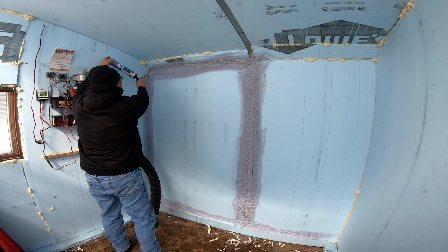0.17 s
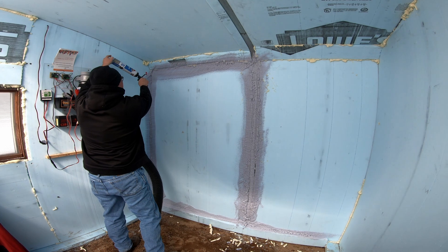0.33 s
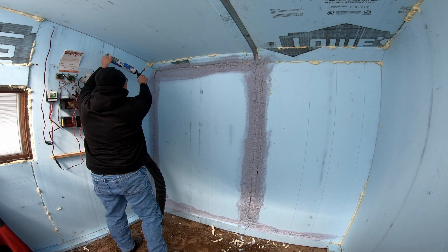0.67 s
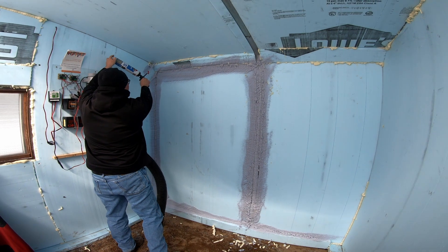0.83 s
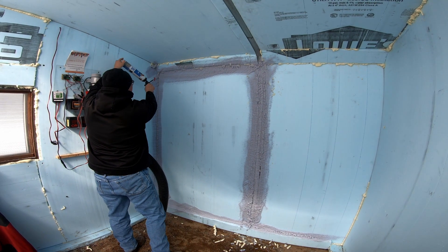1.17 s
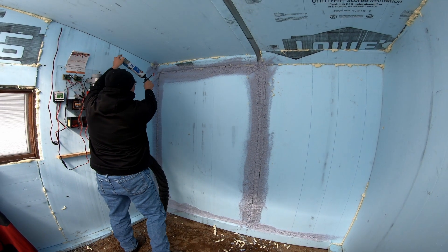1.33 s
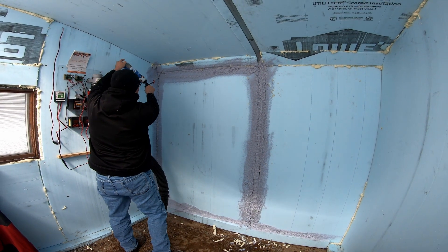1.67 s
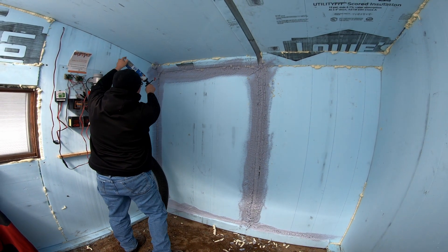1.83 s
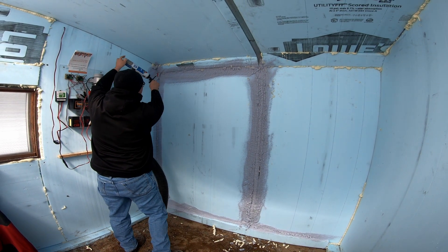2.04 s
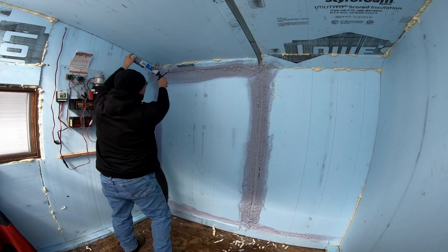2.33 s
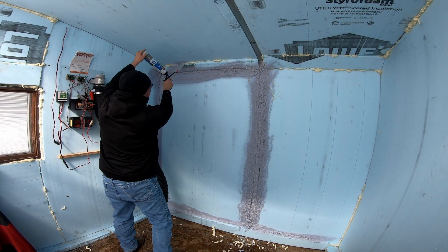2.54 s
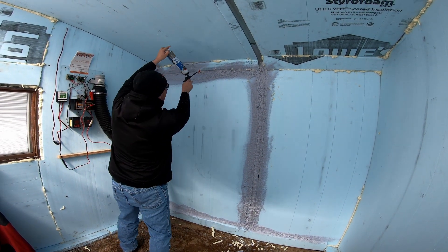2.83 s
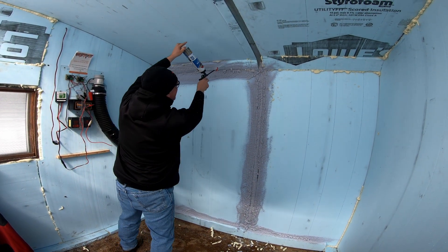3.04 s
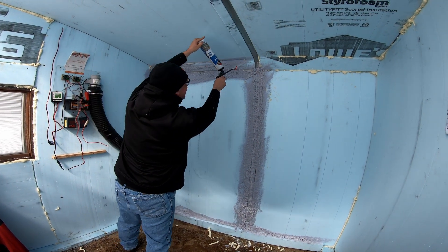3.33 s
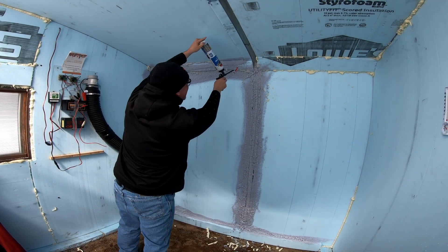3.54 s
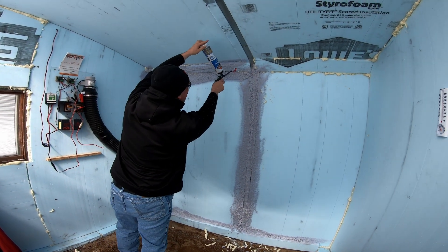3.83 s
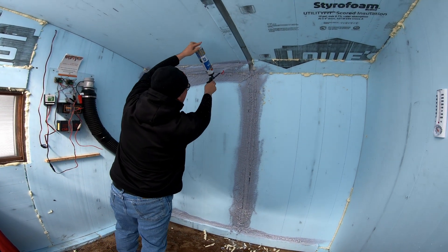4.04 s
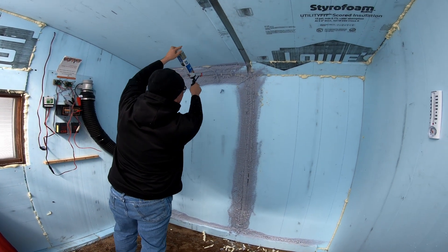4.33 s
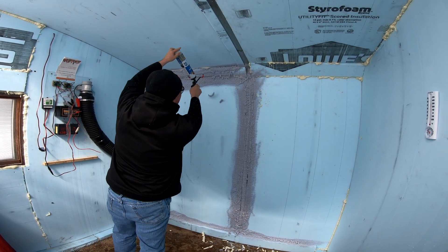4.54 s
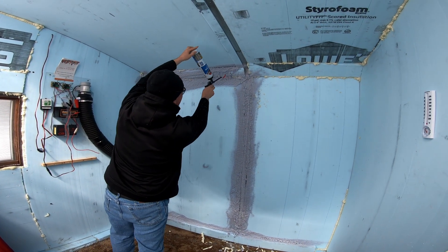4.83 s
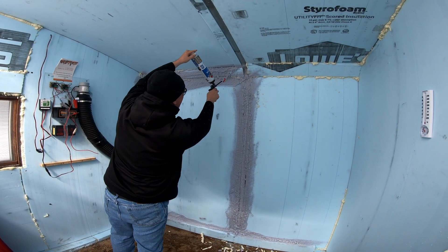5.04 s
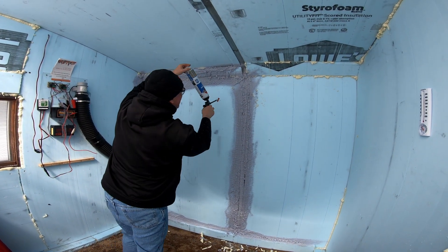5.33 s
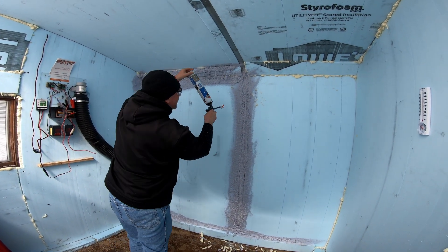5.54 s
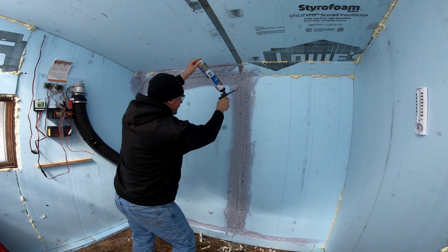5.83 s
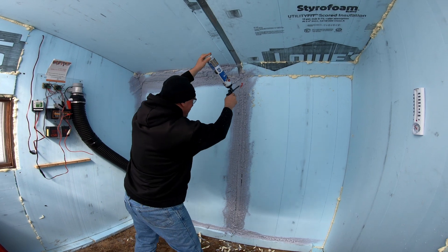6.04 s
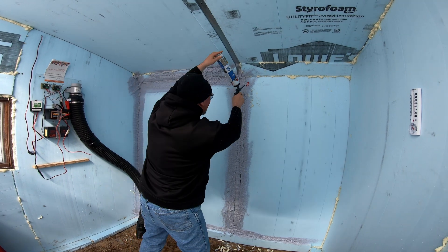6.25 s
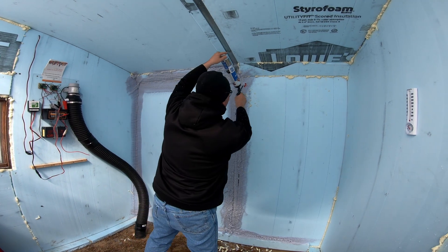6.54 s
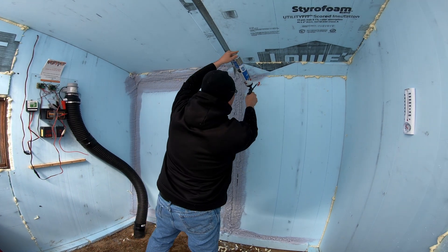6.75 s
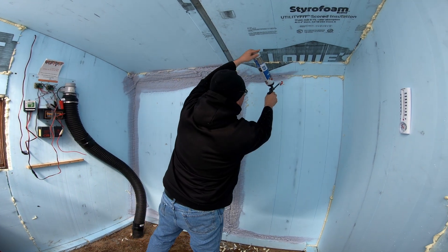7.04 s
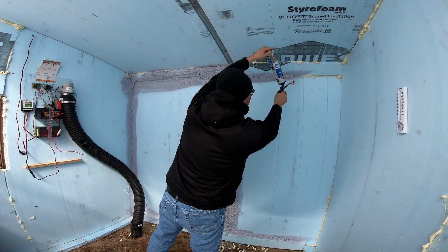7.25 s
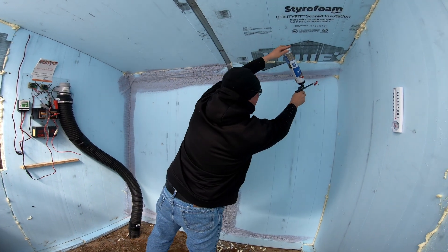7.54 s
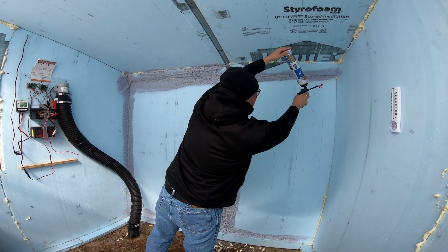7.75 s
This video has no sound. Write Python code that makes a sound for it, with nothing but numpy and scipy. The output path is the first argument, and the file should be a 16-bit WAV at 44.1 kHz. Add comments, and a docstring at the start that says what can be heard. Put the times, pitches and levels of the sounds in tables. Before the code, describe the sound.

A foam gun hisses loudly in a small shed: two quick squirts, a longer spray, then two shorter bursts, each with a low rush underneath and a sudden stop. Boots thud and scuff softly on the wooden floor with a little jacket rustle, then one last long spray follows. The sound is fairly close, with a short room echo and a faint hum.

```python
"""Spraying foam in a small shed

A foam gun moves along the seam of wall and ceiling in a shed lined with foam board. Each trigger pull
frees a turbulent jet: its hiss interferes with echoes from the corner, and its large eddies drive the
shed's low standing waves. Soles and a jacket rub, boots set the floorboards ringing, a faint hum stays."""
import sys
import numpy as np
from scipy import signal
from scipy.fft import rfft, irfft, next_fast_len
from scipy.io import wavfile
from scipy.ndimage import uniform_filter1d, map_coordinates

SR = 44100
rng = np.random.default_rng(int(sys.argv[2]) if len(sys.argv) > 2 else 0)


def master(y):
    """Save y as 16-bit WAV."""
    cut = np.clip(np.atleast_2d(y).T, -1, 1)
    pcm = np.round(cut * 32767)  # scale
    wavfile.write(sys.argv[1], SR, pcm.astype(np.int16))


N = 347949

# trigger pulls: valve cracks t/s, rise while opening/dB, opening time/s, hesitation exponent,
# release t/s, hiss level/dB, roar level/dB, rumble level/dB, hiss tilt/(dB per octave)
TRIGGER_PULLS = [(-.3, 15, .06, 1, 0.017, -25, -43, -52.5, 0),
                 (.768, 17, 0.066, 0.92, 1.019, -22, -38.5, -43.5, 1.5),
                 (1.472, 19, 0.047, 0.58, 1.669, -22.5, -41, -49, 1),
                 (2.32, 16.5, 0.16, 0.98, 3.46, -22.5, -38, -49.5, 1),
                 (3.895, 16, 0.056, 1.2, 4.3914, -23, -39, -51, .5),
                 (4.643, 19.5, 0.05, .8, 4.874, -22, -38.5, -53, 0),
                 (6.532, 10.5, 0.096, 2.5, 7.743, -21.5, -38, -41, 0.48)]
# the gun's travel: t/s, place along the wall/m, near echo delay/ms, its strength (0-1),
# far echo delay/ms, its strength (0-1)
GUN_PATH = [(0, .1, .26, .2, 2.2, .1), (.78, 0, .39, 0.2, 2.5, 0.3), (1.1, 0, .4, 0.2, 2.7, .4),
            (1.48, 0, .48, 0.2, 1.4, 0.3), (1.75, 0, .2, .25, 1.4, .2), (2.33, .3, .15, .1, 2.7, 0),
            (3.5, .6, .52, .1, 1.3, .15), (3.9, 0.85, .54, 0, 1.5, .05), (4.47, 0.62, .47, .15, 0.76, .05),
            (4.65, 0.56, .65, 0, 1.7, .1), (4.96, .8, 0.62, 0.1, 1.4, 0), (6.559, 1.1, 1.1, 0, 1.9, 0.1),
            (7.1, 1.4, .75, .3, 1.5, .15), (7.351, 1.55, .54, 0.4, 0.7, .2), (7.62, 1.7, .33, 0.2, 1, 0.1),
            (7.851, 1.8, 0.23, 0.3, 1.15, 0.1)]
# jet noise, from small eddies to large: f/Hz, spectral level/dB
HISS_SPECTRUM = [(260, -36.5), (450, -13.5), (580, -11.5), (758, -5), (906, -6.5), (1180, -4), (1480, -5),
                 (2770, 0.5), (4520, -3), (7280, -0.5), (10400, -5.5), (11400, -13), (13800, -18),
                 (15800, -27)]
ROAR_SPECTRUM = [(65, -33), (110, -5), (221, 4.5), (371, -5.5), (407, -2), (581, -8.5), (700, -11.5),
                 (910, -37), (1540, -120)]
RUMBLE_SPECTRUM = [(13, -57), (22, -30), (48, -16.5), (67, -8.5), (81, 4.5), (125, 4), (160, -34.5),
                   (280, -120)]
# left-right likeness of the hiss, whose treble the worker's body scatters: f/Hz, coherence
JET_COHERENCE = [(500, 1), (1400, 0.48), (3100, 0.9), (7000, 0.18), (14000, 0.092)]
# the shed's lowest standing waves: f/Hz, bandwidth/Hz, level/dB
STANDING_WAVES = [(84, 10, -9.5), (167, 29, 2), (225.5, 13, -4), (265.5, 16, 0), (407.6, 11, -10.5)]
# bands that stand out at one stretch of wall: f/Hz, width/Hz, lift/dB, place/m, reach/m
WALL_BANDS = [(289, 53, 9.5, 0.11, 0.14), (995, 60, 12, 0, 0.089), (1376, 65, 7.5, 0, .08),
              (410, 40, 10, .6, 0.26), (3570, 400, 5.5, .69, 0.024), (2950, 190, 5.5, .78, 0.046),
              (2840, 310, 4, 1.25, 0.13), (7320, 400, 3.5, 1.45, 0.41), (2800, 230, 5, 1.73, 0.065)]
# the shed's reverberation time: f/Hz, t60/s
REVERB_TIMES = [(100, 0.48), (260, .36), (700, 0.27), (1840, 0.23), (4850, 0.22), (12800, .17)]
# reverberation against direct sound: f/Hz, level/dB
REVERB_LEVELS = [(100, -5.5), (600, 2.5), (3000, -3), (8000, -2), (14000, 0.5)]
# left-right likeness of the reverberation: f/Hz, coherence
REVERB_COHERENCE = [(60, 0.85), (330, 0.93), (640, 0.16), (3000, 0.11), (7000, 0.01)]
# background hum: f/Hz, spectral level/dB
HUM_SPECTRUM = [(13, -38), (22, -19.5), (42, -12.5), (60, -24.5), (103, -25), (134, -11), (160, -3.5),
                (202, -9.5), (487, -17.5), (526, -24), (736, -13.5), (1000, -22.5), (1960, -29.5),
                (2180, -30), (10500, -43), (13600, -78), (22000, -120)]
# left-right likeness of the hum: f/Hz, coherence
HUM_COHERENCE = [(60, 0.25), (300, 0.3), (700, 0.01), (3000, 0.16)]
# soles and jacket rubbing: t/s, swell time/s, t60/s, sole level/dB, cloth level/dB
RUBS = [(.2, .12, 3, -79.5, -90), (.54, .025, .2, -71, -76), (1.2, .1, 3, -79.5, -88),
        (2.05, .12, 3, -78, -90), (3.71, .012, .2, -52.5, -64), (3.78, .05, 3, -76, -82),
        (5.25, 0.036, 2, -74.5, -74), (5.545, .015, .8, -55, -62), (5.67, 0.064, 0.27, -56.5, -68),
        (5.8, .06, 4.5, -77, -81), (6.059, 0.039, 0.38, -55.5, -59.5), (6.19, 0.035, 0.63, -66.5, -68),
        (6.37, 0.053, 3, -70, -66.5)]
# friction noise of sole and jacket: f/Hz, spectral level/dB
SOLE_SPECTRUM = [(290, -26), (500, -4.5), (2070, 0), (2230, -3.5), (2500, -2.5), (4330, -5.5), (4800, -13),
                 (6240, -43.5), (10600, -120)]
CLOTH_SPECTRUM = [(2500, -29), (4500, -2.5), (7500, 0.5), (10500, -8.5), (14000, -26)]
# boots on boards: t/s, relative thud level/dB, bass tilt/(dB per octave), damping factor,
# slap level/dB, slap t60/s, click level/dB
FOOTFALLS = [(3.708, -43, 8.5, 0.93, -46, 0.081, -55), (5.512, -70, 2, 1.1, -76, 0.088, -55),
             (5.55, -46.5, 7, 1.1, -53, 0.15, -52), (5.621, -45, 14, 1.1, -66, 0.2, -57),
             (5.727, -32.5, 2.5, 1.1, -34, 0.084, -41.5), (5.821, -45, -8, 1.7, -46, 0.062, -63),
             (6.061, -37.5, 4, 0.86, -58, 0.155, -57), (6.212, -30.5, 1, 1.42, -71.5, .14, -73),
             (6.304, -58, -2, 1, -75, .1, -58)]
# the floor's normal modes: f/Hz, level/dB, t60/s at damping factor 1
FLOOR_RESONANCES = [(55, -22.5, 0.17), (81, -14.5, .27), (152.6, -3.5, 0.38), (201, 5, 0.19),
                    (224.3, -0.5, 0.28), (257, -11, 0.35), (311, -9.5, 0.25), (370, -11.5, 0.15)]
# a sole's slap: f/Hz, spectral level/dB
SLAP_SPECTRUM = [(240, -43.5), (400, -11.5), (781, -6.5), (1620, -5.5), (1800, -31), (2890, -25),
                 (6460, -40), (7380, -29.5), (14000, -58.5)]
# ring of a slapped board: f/Hz, bandwidth/Hz, level/dB
BOARD_RESONANCES = [(520, 90, -5.5), (734, 150, 4), (974, 150, -4.5), (1360, 95, 4), (1620, 120, -13)]
# stereo balance: f/Hz, left minus right level/dB
STEREO_BALANCE = [(60, -1), (150, -1.0), (380, -0.5), (950, -1.5), (2380, -1), (5980, -2.0), (15000, 2.5)]


def amp(db):
    return 10 ** (np.asarray(db) / 20)


def unit_rms(x):
    return x / np.sqrt(np.mean(x ** 2) + 1e-20)


def along(points, hz):
    """Interpolation of (f/Hz, value) points on a logarithmic frequency axis."""
    f, value = np.transpose(points)
    return np.interp(np.log(hz + 1), np.log(f + 1), value)


def filtered(x, response):
    """Linear filtering: the spectrum is multiplied by a complex frequency response."""
    n = x.shape[-1]
    padded = next_fast_len(n + 8192)
    return irfft(rfft(x, padded) * response(np.fft.rfftfreq(padded, 1 / SR)), padded)[..., :n]


def coloured(spectrum):
    """Spectral shaping of white noise, scaled to unit rms."""
    return unit_rms(filtered(rng.standard_normal(N), lambda hz: amp(along(spectrum, hz))))


def flutter(corner_hz):
    """Random modulation: low-passed noise of unit rms."""
    return unit_rms(filtered(rng.standard_normal(N), lambda hz: 1 / (1 + (hz / corner_hz) ** 2)))


def wobble(knots_per_s):
    """Slow modulation: a spline through random knots."""
    knots = rng.standard_normal(int(N * knots_per_s / SR) + 4)
    return map_coordinates(knots, [np.arange(N) * knots_per_s / SR])


def paired(a, b, coherence):
    """Partial coherence: two independent signals mix as mid and side into left and right."""
    angle = lambda hz: np.arccos(np.clip(along(coherence, hz), -1, 1)) / 2
    mid, side = filtered(np.array([a, b]), lambda hz: np.array([np.cos(angle(hz)), np.sin(angle(hz))]))
    return np.array([mid + side, mid - side])


def resonant_noise(spectrum, modes):
    """Forced resonance: noise drives modes of alternating sign, added to a flat direct path."""
    def response(hz):
        return .35 + sum((-1) ** k * amp(db) * 1j * hz * width / (f * f - hz * hz + 1j * hz * width)
                         for k, (f, width, db) in enumerate(modes))
    return unit_rms(filtered(coloured(spectrum), response))


def valve_flow(t, crack_s=.023, settle_s=.081, ease_s=.055, seal_s=.028, sag_db_per_s=1.36):
    """Throttling by a valve as pressure sags: gives dB re full flow, and the pull's row at each time."""
    rows = np.array(TRIGGER_PULLS)
    pull = rows[np.clip(np.searchsorted(rows[:, 0], t) - 1, 0, None)].T
    start, rise_db, opening_s, hesitation, release = pull[:5]
    ramp = lambda since, length: np.clip((t - since) / length, 0, 1)
    cracked = start + crack_s
    crack_db = 31 * (1 - ramp(start, crack_s))
    opening_db = rise_db * (1 - ramp(cracked, opening_s) ** hesitation)
    settle_db = 2 * (1 - ramp(cracked + opening_s, settle_s))
    closing_db = 11.5 * ramp(release, ease_s) + 75 * ramp(release + ease_s, seal_s)
    return -(crack_db + opening_db + settle_db + sag_db_per_s * (t - start) + closing_db), pull


def gun_geometry(t):
    """A moving source: its place, and the delay and strength of its two echoes, at times t."""
    times, *columns = np.transpose(GUN_PATH)
    return [np.interp(t, times, column) for column in columns]


def hiss(patchy_db=1.7, echo_top_hz=5000, dulling_db_per_octave_s=.27):
    """Interference: jet noise and its close echoes form a comb filter that slides as the gun moves."""
    noise = paired(coloured(HISS_SPECTRUM), coloured(HISS_SPECTRUM), JET_COHERENCE)
    hz, t, bands = signal.stft(noise, SR, nperseg=512)
    hz = hz[:, None]
    _, near_ms, near_strength, far_ms, far_strength = gun_geometry(t)
    reflected = 1 / (1 + (hz / echo_top_hz) ** 2)  # foam board absorbs treble
    comb = np.prod([1 + strength * reflected * np.exp(-2j * np.pi * hz * ms / 1000)
                    for ms, strength in ((near_ms, near_strength), (far_ms, far_strength))], axis=0)
    flow_db, (start, _, _, _, release, *_, tilt) = valve_flow(t)
    octaves = np.clip(np.log2((hz + 1) / 3000), -2, 2)
    tilt_db = (tilt - dulling_db_per_octave_s * np.clip(t - start, 0, 2)) * octaves  # pressure drops
    # an opening valve makes only small eddies
    thin_db = .65 * np.clip(flow_db + 6.5, -25, 0) * (t < release) / (1 + (hz / 1500) ** 4)
    # many smaller reflections come and go as patches of gain
    patches = uniform_filter1d(rng.standard_normal(comb.shape), size=4, axis=0)
    patches = unit_rms(uniform_filter1d(patches, size=16, axis=1))
    bands = bands * comb * amp(tilt_db + thin_db + patchy_db * patches)
    power = uniform_filter1d(np.mean(np.abs(bands) ** 2, axis=(0, 1)), size=20)
    return unit_rms(signal.istft(bands / np.sqrt(power), SR, nperseg=512)[1][:, :N])


def corner_colour(jet, gap_lift_db=9, gap_relative_width=.25, fade_range_db=25):
    """Reinforcement: bands rise at certain stretches of wall, and one follows 1 / near echo delay."""
    hz, t, bands = signal.stft(jet, SR, nperseg=1024)
    hz = hz[:, None]
    place, near_ms, near_strength, *_ = gun_geometry(t)
    gap_db = gap_lift_db * near_strength * np.exp(-((hz * near_ms / 1000 - 1) / gap_relative_width) ** 2)
    wall_db = sum(db * np.exp(-((place - at) / reach) ** 2) * np.exp(-((hz - centre) / width) ** 2)
                  for centre, width, db, at, reach in WALL_BANDS)
    flowing = np.clip(1 + valve_flow(t)[0] / fade_range_db, 0, 1)
    return signal.istft(bands * amp((wall_db + gap_db) * flowing), SR, nperseg=1024)[1][:, :N]


def spray(sputter_db=.99, roar_exponent=1.7, rumble_exponent=2.1, rumble_lag_s=.038):
    """Turbulent jet noise: large eddies need more flow than the hiss, and the largest build later."""
    sputter = amp(sputter_db * flutter(90) - .5)  # foam tears unevenly, so the whole jet flutters
    roar = resonant_noise(ROAR_SPECTRUM, STANDING_WAVES)
    rumble = resonant_noise(RUMBLE_SPECTRUM, STANDING_WAVES)
    t = np.arange(N) / SR
    flow_db, (*_, hiss_db, roar_db, rumble_db, _) = valve_flow(t)
    late_flow_db = np.minimum(flow_db, valve_flow(t - rumble_lag_s)[0])
    jet = (amp(hiss_db + flow_db + .4 * wobble(8)) * hiss()  # each layer surges at random
           + amp(roar_db + roar_exponent * flow_db + wobble(12)) * roar
           + amp(rumble_db + rumble_exponent * late_flow_db + 4.5 * wobble(10)) * rumble)
    return corner_colour(jet * sputter)


def reverberation(source, hop=4096, delay_samples=130):
    """Diffuse reflection: convolution with decaying noise, drawn afresh each hop as the source moves."""
    room = np.zeros((2, N + 4 * hop + SR))
    window = np.hanning(2 * hop + 1)[:-1]
    source = np.pad(filtered(source, lambda hz: amp(along(REVERB_LEVELS, hz))), (hop, 2 * hop))
    for start in range(0, N + hop, hop):
        hz, t, bands = signal.stft(rng.standard_normal((2, SR // 2)), SR, nperseg=256)
        decay = amp(-60 * t / along(REVERB_TIMES, hz)[:, None])
        decay /= np.linalg.norm(decay, axis=1)[:, None]  # equal energy in every band
        a, b = signal.istft(bands * decay, SR, nperseg=256)[1]
        tail = paired(a, b, REVERB_COHERENCE) / np.linalg.norm(a)
        echoes = signal.fftconvolve((source[start:start + 2 * hop] * window)[None], tail, axes=1)
        room[:, start + delay_samples:][:, :echoes.shape[1]] += echoes
    return room[:, hop:hop + N]


def hum(level_db=-66):
    """Stationary noise: a faint low hum with a little air above it."""
    return amp(level_db) * paired(coloured(HUM_SPECTRUM), coloured(HUM_SPECTRUM), HUM_COHERENCE)


def scuffs(grain_db=2, longest_s=.36):
    """Sliding friction: grainy noise swells and fades, dull from the soles, bright from the jacket."""
    grains = amp(grain_db * flutter(150))
    gains = np.zeros((2, N))
    t = np.arange(round(longest_s * SR)) / SR
    ending = np.clip((longest_s - t) / .03, 0, 1)
    for start, swell_s, t60, *levels_db in RUBS:
        swell = np.clip(t / swell_s, 0, 1) ** 2
        fade = amp(-60 * np.maximum(t - swell_s, 0) / t60)
        gains[:, round(start * SR):][:, :len(t)] += amp(levels_db)[:, None] * swell * fade * ending
    return sum(gain * unit_rms(coloured(spectrum) * grains)
               for gain, spectrum in zip(gains, [SOLE_SPECTRUM, CLOTH_SPECTRUM]))


def footsteps(rise_s=.0037, click_t60=.045):
    """Impact excitation: a heel rings the floor's damped modes; the sole slaps and its edge clicks."""
    thuds, slap_gain, click_gain = np.zeros((3, N + SR))
    t = np.arange(SR // 2) / SR
    rise = 1 - np.exp(-t / rise_s)
    for start, thud_db, bass_tilt, damping, slap_db, slap_t60, click_db in FOOTFALLS:
        ring = np.zeros(len(t))
        for hz, db, t60 in FLOOR_RESONANCES:
            mode_db = db + bass_tilt * np.log2(200 / hz) + rng.normal(0, 1.3)  # heavy steps favour bass
            ring += amp(mode_db - 60 * t * damping / t60) * np.sin(2 * np.pi * hz * t)
        span = slice(round(start * SR), round(start * SR) + len(t))
        thuds[span] += amp(thud_db - 3) * ring * rise
        slap_gain[span] += amp(slap_db - 60 * t / slap_t60) * rise
        click_gain[span] += amp(click_db - 60 * t / click_t60) * rise
    slaps = slap_gain[:N] * resonant_noise(SLAP_SPECTRUM, BOARD_RESONANCES)
    clicks = click_gain[:N] * (coloured(SOLE_SPECTRUM) + coloured(CLOTH_SPECTRUM))
    return thuds[:N], slaps + clicks


def scene(left_lag_s=1.2e-5):
    """Superposition of direct sound, which arrives slightly later on the left, reverberation and hum."""
    thuds, soles = footsteps()
    near = spray() + soles + scuffs()
    side = np.array([[.5], [-.5]])
    direct = filtered(near + thuds, lambda hz: np.exp(-2j * np.pi * hz * left_lag_s * side))
    room = reverberation(near[0] + amp(-1) * thuds)  # the floor's modes carry a tail of their own
    return filtered(direct + room, lambda hz: amp(side * along(STEREO_BALANCE, hz))) + hum()


def record(dry):
    """Band limiting: a steep low-pass with a raised-cosine edge."""
    top_hz, edge_hz = 15930, 120
    return filtered(dry, lambda hz: np.sin(np.pi / 2 * np.clip((top_hz - hz) / edge_hz, 0, 1)) ** 2)


dry = scene()
out = record(dry)
master(out)
```